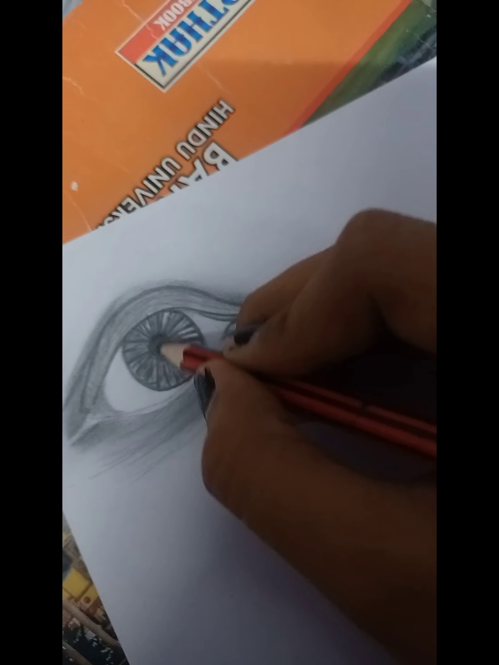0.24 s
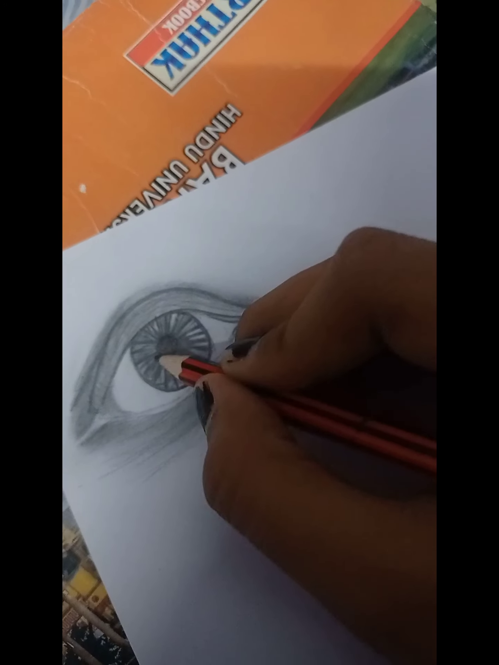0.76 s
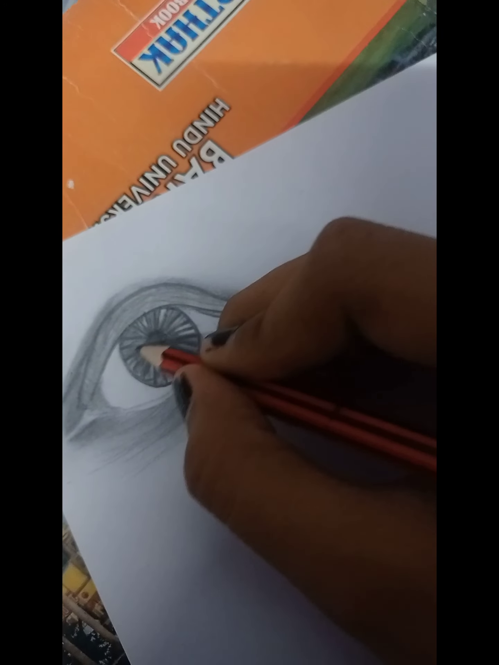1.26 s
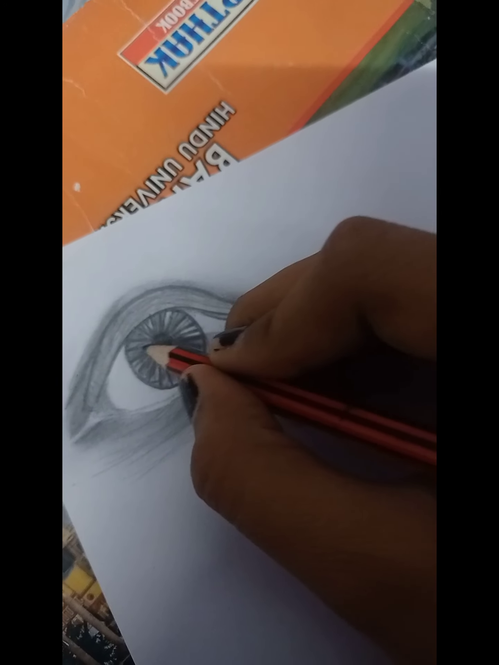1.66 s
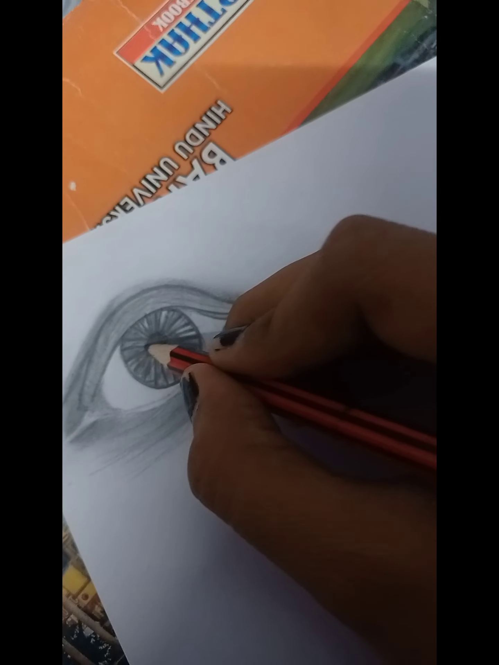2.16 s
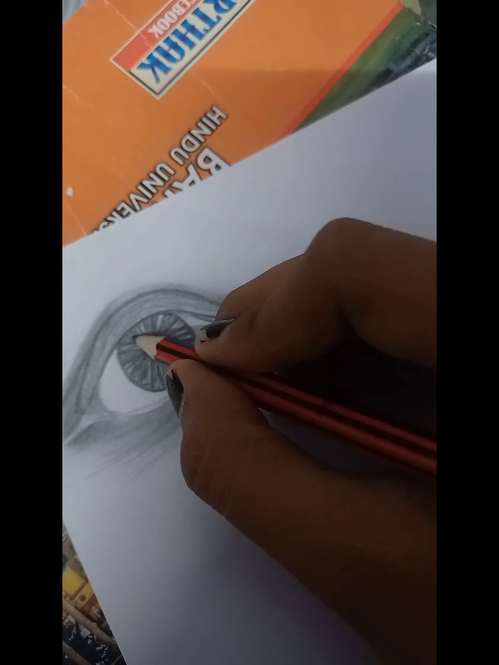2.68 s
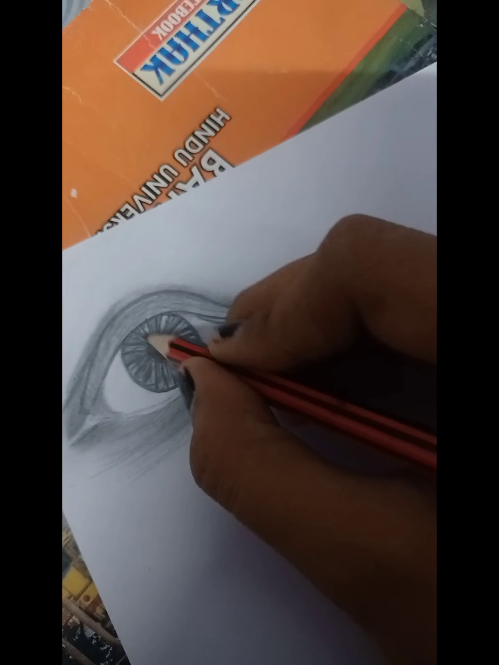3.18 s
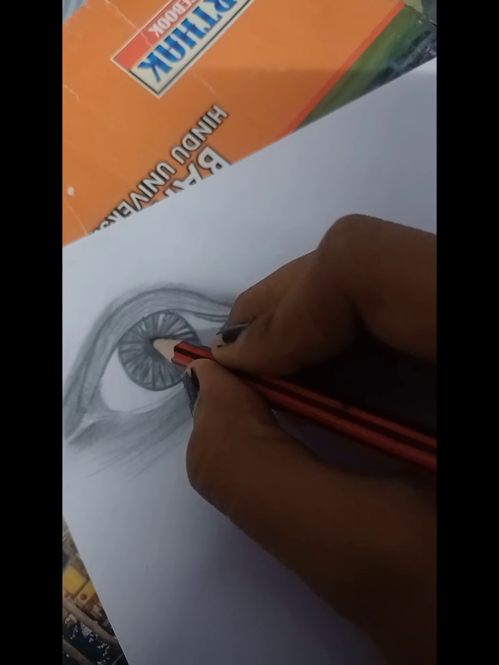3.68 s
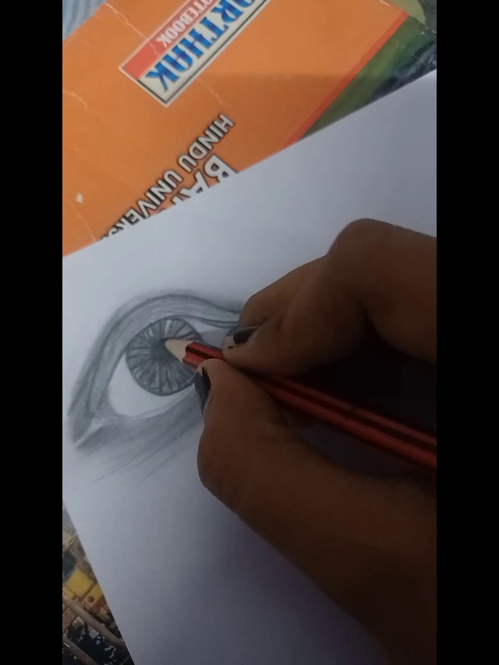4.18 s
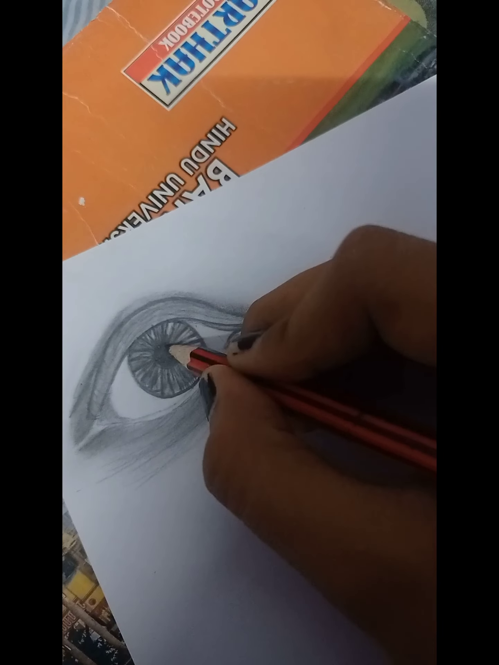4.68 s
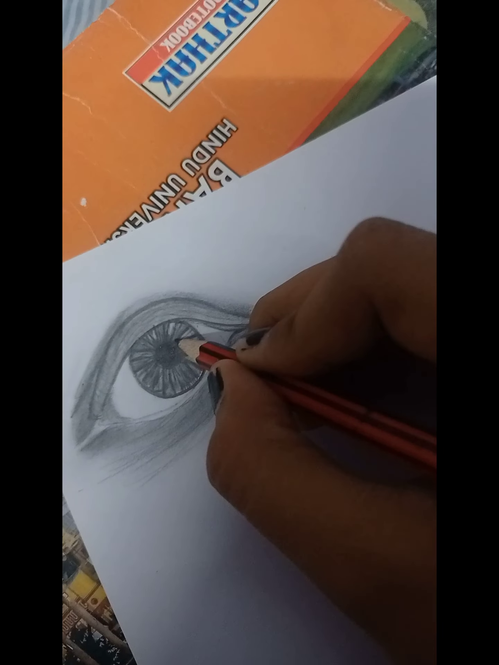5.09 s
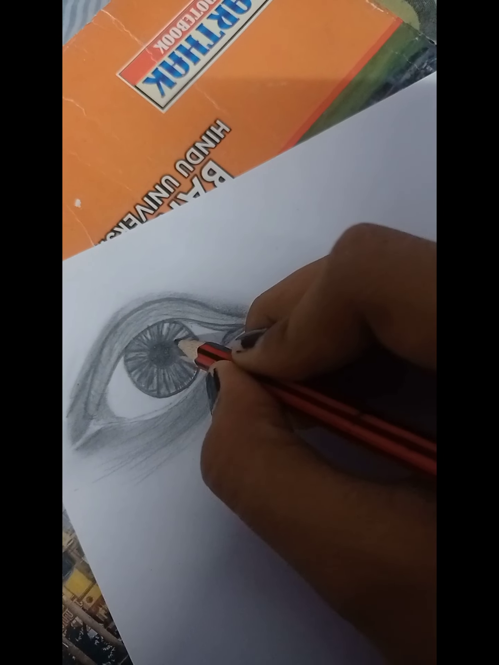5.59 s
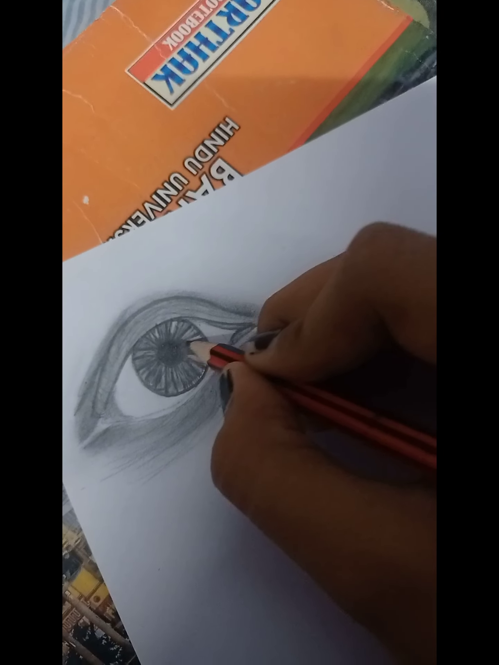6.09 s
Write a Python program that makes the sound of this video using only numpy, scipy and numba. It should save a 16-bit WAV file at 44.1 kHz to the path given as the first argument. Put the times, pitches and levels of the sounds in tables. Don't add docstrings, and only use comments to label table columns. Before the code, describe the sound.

Steady low fan drone in a room, with uneven gusts buffeting the microphone, heavy at first, calmer midway, then returning in bursts.

```python
import sys
import numpy as np
from scipy import signal
from scipy.fft import rfft, irfft, next_fast_len
from scipy.io import wavfile
from scipy.ndimage import uniform_filter1d, minimum_filter1d
from numba import njit

SR = 44100
rng = np.random.default_rng(int(sys.argv[2]) if len(sys.argv) > 2 else 0)


def ratio_of_db(decibels):
    return 10 ** (np.asarray(decibels, float) / 20)


def transcribe(signal):
    frames = np.atleast_2d(signal).T
    limited = np.clip(frames, -1, 1)
    pcm = np.round(limited * 32767).astype(np.int16)
    wavfile.write(sys.argv[1], SR, pcm)


N = 279946


def level(x, db):
    return x * ratio_of_db(db) / np.sqrt(np.mean(x ** 2))


def walk(rate):
    hold = max(int(SR / rate), 65)
    steps = rng.standard_normal(N // 64)[np.arange(N) // hold]
    return level(uniform_filter1d(uniform_filter1d(steps, hold), hold), 0)


def blades():
    # multiple of the blade rate, rms level in dB.
    blade_tones = [(1, -34.5), (2, -29.5), (3, -43.5), (5, -72), (6, -63), (10, -60)]
    blade_hz = 106.48
    turns = np.cumsum(blade_hz * (1 + .0015 * walk(2.5))) / SR
    out = np.zeros(N)
    for multiple, db in blade_tones:
        waver_db = (1.1 + 1.1 * abs(np.log2(multiple / 2))) * walk(19)
        out -= np.sqrt(2) * ratio_of_db(db + waver_db) * np.cos(2 * np.pi * multiple * turns)
    return out


def patchy(x):
    patch_db, patch_hz, patch_s, top_hz = 2, 130, .07, 3300
    hz, s, cells = signal.stft(x, SR, nperseg=1024)
    field = rng.standard_normal(cells.shape)
    for axis, width in enumerate((patch_hz / hz[1], patch_s / s[1])):
        field = uniform_filter1d(field, max(int(width), 1), axis=axis)
        field = uniform_filter1d(field, size=2, axis=axis)
    fade = 1 + (hz[:, None] / top_hz) ** 4
    change_db = level(field, 0) * patch_db / fade
    return signal.istft(cells * ratio_of_db(change_db), SR, nperseg=1024)[1][:N]


def hiss():
    # pitch in Hz, level in
    # dB per Hz.
    air = [(40, -2.5), (100, 3.5), (200, 8.5), (330, 11.5), (430, 4), (560, -4), (880, -3), (1060, -1),
           (1220, -4.5), (1900, -2), (2600, -7.5), (3200, -14),
           (3750, -16.5), (4100, -22), (5000, -27.5), (6400, -35), (7400, -32.5), (8100, -30),
             (9000, -36.5), (10000, -42.5), (12500, -46), (13200, -41.5), (16000, -40.5)]
    size = next_fast_len(N)
    hz = np.maximum(np.fft.rfftfreq(size, 1 / SR), 1)
    at_hz, db = np.transpose(air)
    colour = ratio_of_db(np.interp(np.log(hz), np.log(at_hz), db))
    whole = rfft(rng.standard_normal(size)) * colour
    place = 2 * np.log2(hz)
    out, swell = 0, walk(5.8)
    for centre in range(8, 30):
        share = np.clip(1 - abs(place - centre), 0, 1)
        band = irfft(whole * share, size)[:N]
        flicker_db = (.1 + centre / 24) * walk(17)
        out = out + ratio_of_db(.35 * swell + flicker_db) * band
    return level(patchy(out), -35)


def gusts():
    # start in seconds, length in seconds, swing level in dB, swing rate in Hz.
    gust_rows = [(-.02, 0.17, -15, 127), (0.155, 0.12, -18.5, 139.3), (0.319, 0.14, -17, 131),
                 (0.524, .08, -17.5, 128.5), (0.699, .14, -25.5, 110), (0.861, .155, -18, 136.8),
                 (1.215, 0.036, -20.5, 159.6), (1.311, 0.072, -21.5, 135), (1.423, 0.16, -21.5, 150),
                 (1.61, 0.045, -16.5, 123), (1.694, 0.14, -19, 122), (1.833, 0.19, -18.5, 141.6),
                 (2.069, 0.22, -24, 112.6), (2.281, .24, -29.5, 130), (2.64, .165, -26.5, 136),
                 (2.846, 0.14, -32, 143.6), (3.036, 0.046, -28.5, 143), (3.164, 0.035, -21, 139),
                 (3.224, 0.12, -33, 137.7), (3.506, 0.1, -36.5, 149.4), (4.006, 0.092, -26, 152),
                 (4.142, 0.25, -36, 145), (4.691, .11, -32.5, 149), (4.847, .065, -19.5, 121.6),
                 (5.025, 0.051, -10.5, 112), (5.199, 0.1, -21.5, 120.8), (5.346, 0.039, -27.5, 127),
                 (5.627, 0.12, -29, 120.4), (5.841, 0.18, -26.5, 124.6), (6.044, 0.29, -17, 135.7)]
    rise_s, fall_s, sag_db = .021, 0.038, -2
    lull_db, lull_hz, lull_stir_db = -38.5, 112, 4
    t = np.arange(N) / SR
    lull = ratio_of_db(lull_db + lull_stir_db * walk(17)) ** 2
    power, rate = lull, lull * lull_hz
    for s, length, db, hz in gust_rows:
        rise = np.exp(-(np.minimum(t - s - rise_s, 0) / rise_s) ** 2)
        fall = np.exp(-(np.maximum(t - s - length + fall_s, 0) / fall_s) ** 2)
        sagging_db = db + sag_db * np.clip((t - s) / length - .5, -.5, .5)
        push = (ratio_of_db(sagging_db) * rise * fall) ** 2
        power, rate = power + push, rate + push * hz
    return 10 * np.log10(power), rate / power, lull / power


def eddies(hz, per_s, spread, scatter_db, cycles):
    out = np.zeros(2 * N)
    chance = rng.standard_normal((N // 64, 4))[:int(N / SR * per_s)]
    at = (np.arange(len(chance)) + 0.3907 * chance[:, 0]) * SR / per_s
    at = np.clip(at, 0, N - 1).astype(int)
    for i, (_, size, push, start) in zip(at, chance):
        period = SR / np.clip(hz[i] * np.exp(spread * size), 30, 1500)
        turn = np.arange(int(period * cycles) + 2) / period
        swing = np.hanning(len(turn)) * np.sin(2 * np.pi * (turn + start))
        out[i:i + len(turn)] += ratio_of_db(scatter_db * push) * swing
    out = out[300:][:N]
    even = np.sqrt(uniform_filter1d(out ** 2, int(0.029 * SR)) + 0.012)
    return level(out / even ** 0.69, 0)


def draught():
    db, hz, lull = gusts()
    fine_gust_db, fine_lull_db = -5.5, -3
    fine_db = fine_gust_db + (fine_lull_db - fine_gust_db) * lull
    large = eddies(0.915 * hz, per_s=85, spread=0.32, scatter_db=4.75, cycles=1.83)
    fine = eddies(2.035 * hz, per_s=170, spread=.2, scatter_db=1.6, cycles=2.75)
    return ratio_of_db(db - 2.0) * (large + ratio_of_db(fine_db - 4.5) * fine)


def puffs():
    # time of deepest suction in seconds, peak in dB, pitch in Hz, edge in dB.
    sharp = [(0.0002, -12, 172, -47), (0.037, -11.5, 240, -41), (0.1575, -9.5, 200, -25),
             (0.1815, 2.5, 162, -13), (0.2112, 0, 270, -15), (0.2148, 8, 272, -12.5),
             (0.2256, 6.5, 196, -15), (0.3585, -8, 188, -42), (0.386, -6, 150, -26), (0.5675, -9, 172, -26),
             (0.7958, -24, 200, -19.5), (0.878, -13.5, 170, -39), (0.9115, -17, 192, -35),
             (0.9562, -14, 202, -33), (0.9625, -5, 151, -25.5), (0.9865, -5, 190, -36),
             (1.5125, -17, 214, -27), (1.5215, -7.5, 150, -32), (1.7615, -11, 138, -37),
             (1.886, -3.5, 149, -35), (1.9195, -6, 220, -21.5), (1.9437, -2, 171, -28),
             (2.087, -9, 150, -38), (4.8717, -8, 182, -31), (6.122, -9.5, 194, -43.5),
             (6.1595, -14, 184, -32), (6.278, -13, 280, -37), (6.3058, -4, 298, -32), (6.3112, 1, 172, -24),
             (6.3393, -6, 201, -23.5)]
    # time of deepest suction in seconds, peak in dB, pitch in Hz.
    blunt = [(0.102, -19, 201), (0.2431, -4, 130), (0.344, -1.5, 160), (0.413, -9.5, 148),
             (0.7314, -13, 200), (1.003, -6.5, 140), (1.349, -14, 111), (1.692, -14, 119),
             (2.1136, -9.5, 154), (2.179, -15.5, 118), (2.661, -20, 125), (2.716, -22, 124),
             (2.854, -33, 130), (2.907, -16.5, 140), (2.9706, -11, 167), (3.1665, -8, 140),
             (3.541, -15, 190), (4.083, -16, 130), (5.029, -11.5, 118), (5.037, -17, 110),
             (5.215, -10.5, 127.5), (5.235, -20, 110), (5.264, -20, 175), (5.499, -15, 199),
             (5.661, -13, 105), (5.76, -20, 130), (5.987, -5.5, 119), (6.0539, -17, 147), (6.106, -7, 111),
             (6.329, -5, 150)]
    blunt_edge_db = -28
    start_turn, start_spread = -0.11, .03
    edge_hz, edge_s = 573, 0.00061
    t = np.arange(SR // 10) / SR
    out = np.zeros(N + 2 * len(t))
    rows = sharp + [(s, db, hz, db + blunt_edge_db) for s, db, hz in blunt]
    for (s, db, hz, edge_db), chance in zip(rows, rng.standard_normal(100)):
        span = 1.275 / hz
        lead = 0.427 * span
        shape = np.minimum(t / 0.002, 1) * (t / span) ** 0.45 * np.exp(1 - t / span * 1.23) * 0.82
        turns = hz * span * np.log1p(2.22 * t / span)
        swing = shape * np.sin(2 * np.pi * (turns + start_turn + start_spread * chance))
        thin = np.exp(-.5 * ((t - lead) / edge_s) ** 2)
        edge = -thin * np.cos(2 * np.pi * (edge_hz * (t - lead) + 0.034))
        i = int((s - lead) * SR) + len(t)
        out[i:i + len(t)] += ratio_of_db(db - 1.5) * swing + ratio_of_db(edge_db + 3.5) * edge
    return out[len(t):len(t) + N]


def port(wind):
    mesh = signal.butter(3, 1130, fs=SR, output="sos")
    vent = signal.butter(4, 67.5, "highpass", fs=SR, output="sos")
    return signal.sosfilt(vent, signal.sosfiltfilt(mesh, wind))


def scene():
    wind = port(draught() + puffs())
    return (blades() + hiss() + wind)[None]


@njit
def follow(x, attack, release):
    y, e = np.empty(len(x)), 0.
    for i in range(len(x)):
        e += (x[i] - e) * (attack if x[i] > e else release)
        y[i] = e
    return y


def low_pass(x):
    return signal.sosfilt(signal.butter(12, 15720, fs=SR, output="sos"), x)


def record(dry):
    top, ratio, ahead = .43, 3.0, 400
    size = np.abs(dry[0])
    peak = follow(size, 1 / (0.0017 * SR), 1 / (.11 * SR))
    gain = np.minimum(1, top / (peak + 1e-9)) ** (1 - 1 / ratio)
    gain = uniform_filter1d(np.roll(gain, -ahead), size=400)
    ceiling = minimum_filter1d(.82 / (size + 1e-9), size=201)
    gain = np.minimum(gain, uniform_filter1d(ceiling, size=201))
    return low_pass(dry * gain)


dry = scene()
out = record(dry)
transcribe(out)
```